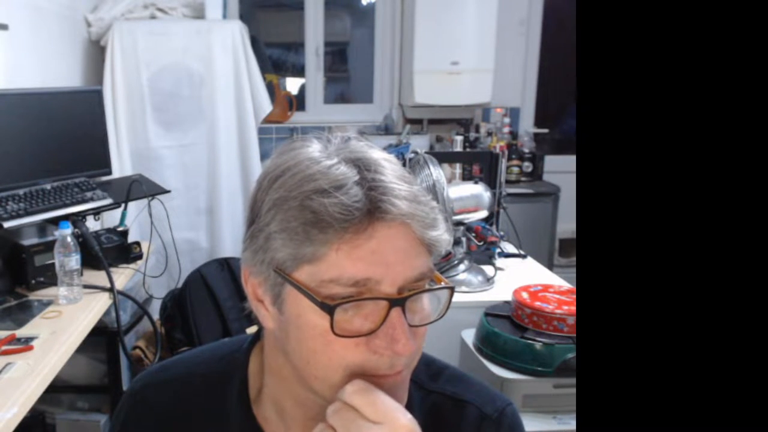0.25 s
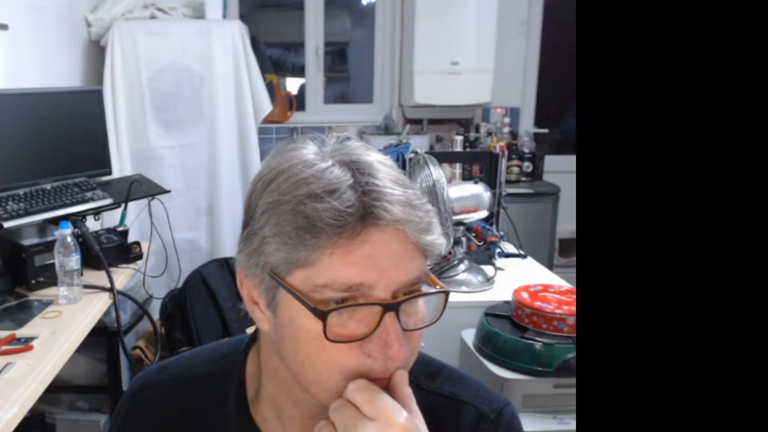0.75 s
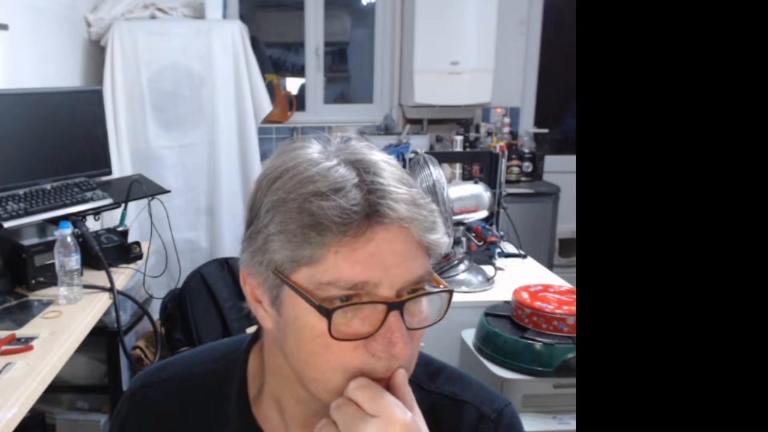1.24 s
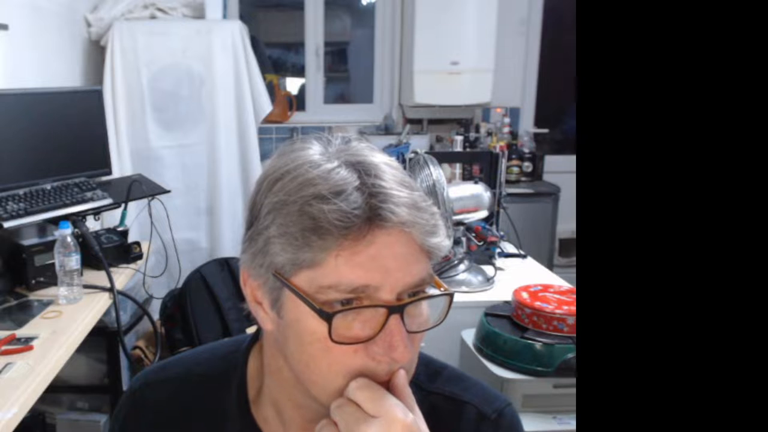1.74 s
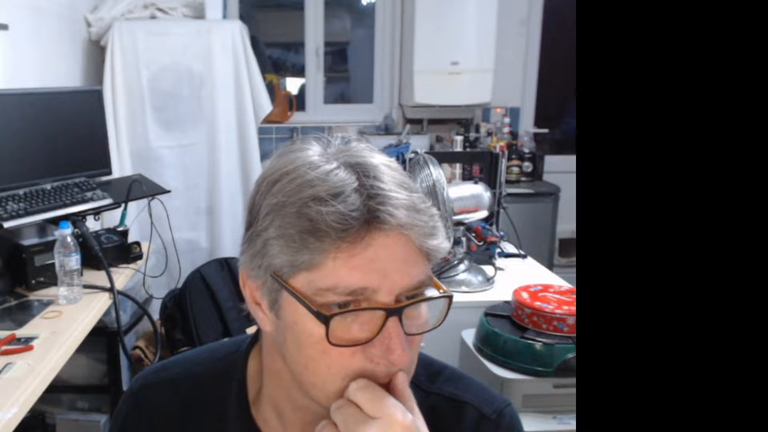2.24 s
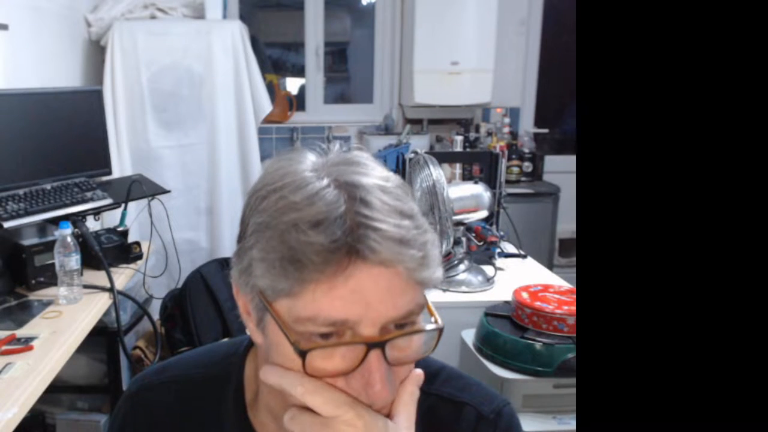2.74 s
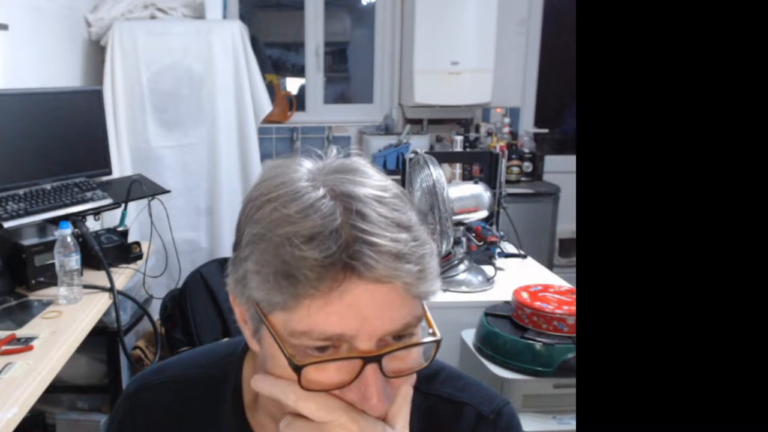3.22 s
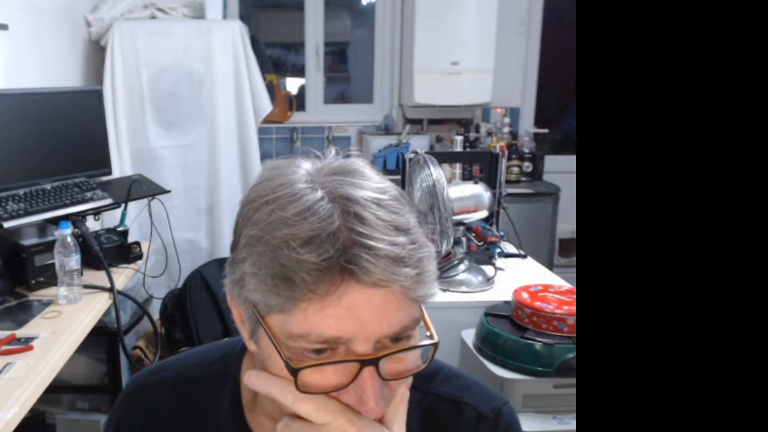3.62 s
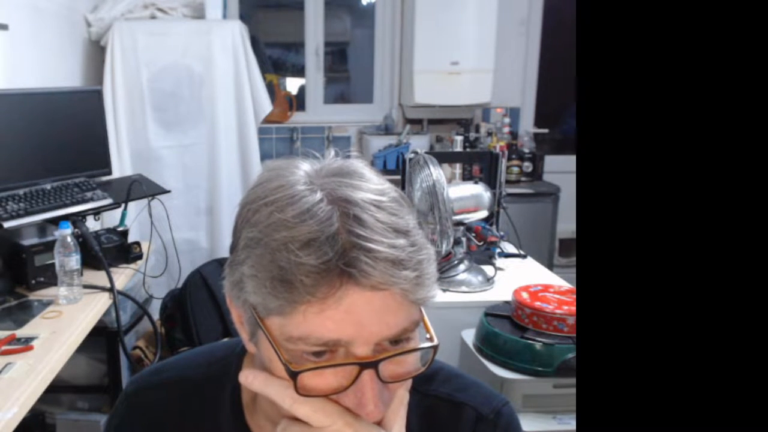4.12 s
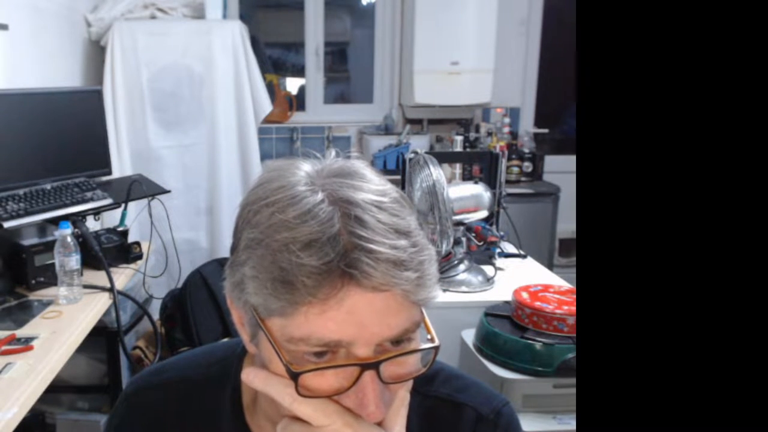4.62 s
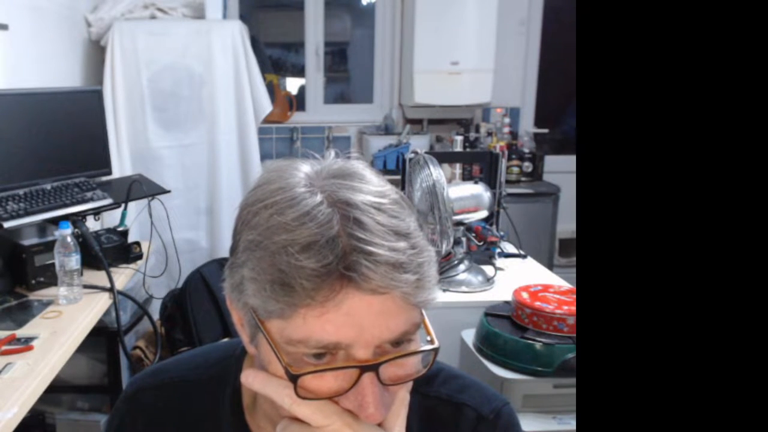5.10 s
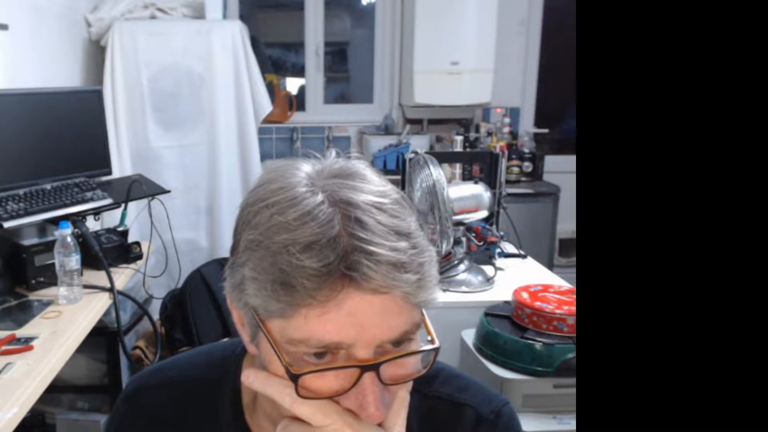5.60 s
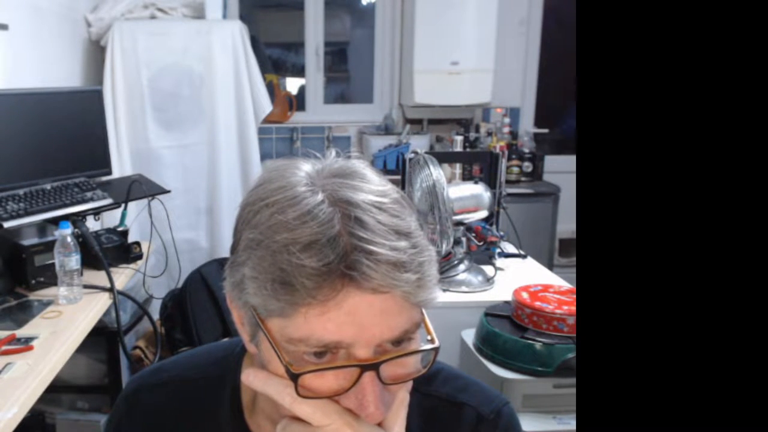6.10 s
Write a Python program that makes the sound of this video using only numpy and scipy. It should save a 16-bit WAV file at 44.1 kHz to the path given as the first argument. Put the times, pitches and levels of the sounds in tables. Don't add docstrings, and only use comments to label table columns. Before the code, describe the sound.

Throughout, two small fans run at nearly equal speeds, making a low, slightly wavering drone whose tones beat together, with motor rumble, mains hum and a steady soft rush of air. At about 0.1 s a hard object clacks sharply onto the desk in a tight chatter, rebounding around 0.15 s with a slightly lower, woody knock; the fan noise dips and creeps back. Near 1.7 and 1.8 s a small switch ticks down and up, bright and quiet. At 2.6 s a soft low thump leads into a loud, cracking knock at 2.75 to 2.8 s, bouncing quickly on the desk, and the background ducks again. Around 3.8 and 3.9 s come fainter, thinner ticks, with a barely audible last one near 4.0 s. Between about 2 and 5 s the fans rise very slightly in pitch and settle, continuing alone until 6.3 s. The room tail is short; treble is muted.

```python
import sys
import numpy as np
from scipy import signal
from scipy.fft import rfft, irfft, next_fast_len
from scipy.io import wavfile
from scipy.ndimage import uniform_filter1d

SR = 44100
rng = np.random.default_rng(int(sys.argv[2]) if len(sys.argv) > 2 else 0)


def volts(x):
    e = np.asarray(x, float) / 20
    return 10 ** e


def to_wav(s):
    ch = np.atleast_2d(s).T
    pcm = np.round(np.clip(ch, -1, 1) * 32767)
    wavfile.write(sys.argv[1], SR, pcm.astype(np.int16))


N = 280035


def wander(rate_hz):
    hold = int(SR / rate_hz)
    steps = np.repeat(rng.standard_normal(N // hold + 1), hold)
    return 1.1 * uniform_filter1d(uniform_filter1d(steps, hold), hold)[:N]


def lag(x, tau_s):
    keep = np.exp(-1 / (tau_s * SR))
    return signal.lfilter([1 - keep], [1, -keep], x)


def fan(rate_hz, multiples):
    turn = 2 * np.pi * np.cumsum(rate_hz) / SR
    tones = np.zeros(N)
    for multiple, level_db in multiples:
        strength = np.sqrt(2) * volts(level_db + 1.2 * wander(4.0))
        tones += strength * np.sin(multiple * turn + 2 * np.pi * rng.random())
    return tones


def two_fans():
    # multiple, level_db [dB rms]
    tones_one = [(1, -71), (2, -77), (3, -60), (4, -60.5), (5, -54.5), (6, -64), (7, -79), (8, -66.5),
                 (9, -85), (10, -64.5), (11, -74.5), (12, -58.5), (16, -70)]
    tones_two = [(1, -67), (2, -77.5), (3, -75), (4, -72.5), (5, -59.5), (6, -71), (7, -69), (8, -76.5),
                 (9, -74.5), (10, -72), (11, -69.5), (16, -69)]
    # time_s, rate_hz
    speed_one = [
        (2.35, 76.2),
        (3.35, 76.82),
        (4.45, 77.06),
        (5.2, 76.54),
        (6.35, 76.38),
    ]
    speed_two = [
        (1.55, 79.27),
        (2.3, 80.07),
        (3.55, 80.21),
        (4.4, 79.4),
        (6.35, 79.0),
    ]
    t = np.arange(N) / SR
    rate_one = np.interp(t, *np.transpose(speed_one))
    rate_two = np.interp(t, *np.transpose(speed_two))
    return fan(rate_one, tones_one) + fan(rate_two, tones_two)


def motors():
    # pitch_hz, level_db [dB rms]
    shaft_tones = [(38.08, -56.0), (40.86, -62.9), (48.74, -77.2), (53.52, -76.2), (97.64, -74.7),
                   (99.91, -68.9), (249.65, -78.2)]
    in_step_s, whine_hz, whine_db = 0.6, 6565, -87
    t = np.arange(N) / SR - in_step_s
    hum = np.zeros(N)
    for pitch_hz, level_db in shaft_tones:
        hum += volts(level_db - 0.5 + 2.0 * wander(1.8)) * np.sin(2 * np.pi * pitch_hz * t)
    whine_turn = 2 * np.pi * np.cumsum(whine_hz + 15 * wander(3.3)) / SR
    return np.sqrt(2) * (hum + volts(whine_db) * np.sin(whine_turn))


def air():
    # frequency_hz, density_db [dB per Hz]
    air_curve = [(22, -104), (40, -87.5), (110, -81), (250, -86.5), (1050, -87), (2000, -83.5), (4400, -99),
                 (8200, -104)]
    # centre_hz, width_hz, lift_db
    housing = [(751, 90, 8), (882, 61, 9), (1195, 67, 3.5), (1360, 350, 1.5), (1630, 220, 2.5),
               (1936, 120, 2.5), (3570, 320, 2), (5070, 430, 2), (5720, 920, -4), (6400, 820, 1.5)]
    size = next_fast_len(N + 1, real=True)
    hz = np.maximum(np.fft.rfftfreq(size, 1 / SR), 1)
    curve_hz, curve_db = np.transpose(air_curve)
    density_db = np.interp(np.log(hz), np.log(curve_hz), curve_db)
    density_db = density_db + sum(lift_db / (1 + (2 * (hz - centre_hz) / width_hz) ** 2)
                                  for centre_hz, width_hz, lift_db in housing)
    spectrum = rfft(rng.standard_normal(size)) * volts(density_db) * np.sqrt(SR / 2)
    band = np.clip(np.round(2 * np.log2(hz)), 10, 26)
    swell_db = 0.5 * wander(1.09)
    rush = np.zeros(N)
    for b in np.unique(band):
        flicker_db = 0.53 * wander(9)
        rush += volts(swell_db + flicker_db) * irfft(spectrum * (band == b), size)[:N]
    return rush


def knock(hits, modes, crack_db=-1.5):
    crack_t60_s, crack_hz = 0.02, 4500
    out = np.zeros(N)
    t = np.arange(SR // 9) / SR
    hz, db, t60_s = np.transpose(modes)[:, :, None, None]
    crowd = 0.037 * np.clip((hz - 900) / 1800, 0.1, 1)
    spread = np.linspace(-1.5, 1.5, 5)[:, None]
    chance = rng.standard_normal((len(hits), 3, len(modes), 5, 1))
    cracks = lag(rng.standard_normal((len(hits), len(t))), 1 / (2 * np.pi * crack_hz))
    cracks = cracks * np.exp(-np.log(1000) / crack_t60_s * t)
    for (start_s, force_db, contact_ms), (spot, detune, late), crack in zip(hits, chance, cracks):
        lead = np.sign(spot[:, :1])
        stir = lead * 0.57 + (0.79 * np.sign(spot) - lead * 0.61) * (crowd > 0.012)
        since = np.maximum(t - 0.00044 * np.abs(late), 0)
        pitch_hz = hz * (1 + crowd * (spread + 0.3 * detune))
        ring = volts(db) * stir * np.sin(2 * np.pi * pitch_hz * since)
        ring = ring * np.exp(-np.log(1000) / t60_s * since)
        ring = ring * np.minimum(since / 0.00037, 1)
        struck = ring.sum((0, 1)) + volts(crack_db) * crack
        push = np.sin(np.pi * np.clip((t[:300] + 0.5 / SR) / (contact_ms / 1000), 0, 1))
        at = int(start_s * SR)
        out[at:at + len(t)] += volts(force_db) * signal.fftconvolve(struck, push / push.sum())[:len(t)]
    return signal.sosfilt(signal.butter(2, 95, "high", fs=SR, output="sos"), out)


def clack_and_rebound():
    # pitch_hz, level_db, t60_s
    clack_modes = [(249, -19, 0.11), (801, -3.5, 0.026), (1015, 1, 0.021), (1460, -4, 0.016),
                   (1750, -4.5, 0.017), (2140, -2, 0.013), (3150, -14.5, 0.029), (3900, -14, 0.024),
                   (4800, -2, 0.011), (5400, -22, 0.01), (6190, -9.5, 0.016), (7300, -6.5, .015)]
    rebound_modes = [(143, -20.5, 0.11), (306, -17.5, 0.094), (736, -0.5, 0.022), (1044, -2, 0.016),
                     (1490, 0.5, 0.016), (1667, -7, .014), (2460, -16, .015), (3280, -14.5, .015),
                     (4240, -11.5, 0.013), (4770, -12, 0.016), (5700, -14, .015), (6430, -10.5, 0.017),
                     (7300, -11, .015)]
    # start_s, force_db, contact_ms
    clack_hits = [
        (.083, -42, 0.56),
        (.094, -45, 0.17),
        (.0992, -24.5, 0.07),
        (.1, -22.5, 0.25),
        (.1035, -26.5, 0.055),
        (.1092, -34.5, 0.31),
        (.1118, -28.5, 0.3),
        (.118, -34.5, 2.5),
    ]
    rebound_hits = [
        (.1436, -18.5, 0.17),
        (.1482, -29.5, 0.097),
        (.159, -21, 1.6),
        (.17, -34, 0.51),
    ]
    return knock(clack_hits, clack_modes, crack_db=1) + knock(rebound_hits, rebound_modes, crack_db=1)


def switch_ticks():
    # pitch_hz, level_db, t60_s
    switch_modes = [(3650, -2, .02), (4660, -21, .012), (5410, 1, 0.013), (6230, -2.5, .025),
                    (7300, 2, 0.025), (8100, 13, .015)]
    # start_s, force_db, contact_ms
    switch_hits = [
        (1.6785, -48, 0.1),
        (1.7995, -49, .05),
        (1.81, -62, 0.087),
    ]
    return knock(switch_hits, switch_modes)


def thump():
    # pitch_hz, level_db, t60_s
    thump_modes = [(144.4, -4.5, 0.17), (274, -2, .07), (420, -9, .05)]
    # start_s, force_db, contact_ms
    thump_hits = [
        (2.621, -46, 1.6),
        (2.629, -46.5, 1.6),
        (2.645, -52, 1.4),
    ]
    return knock(thump_hits, thump_modes)


def desk_bounce():
    # pitch_hz, level_db, t60_s
    desk_modes = [(139, -14, 0.076), (236, -10.5, 0.065), (322, -11, .11), (652, -5, 0.027),
                  (765, -7, 0.03), (1037, -6.5, 0.042), (1260, -3.5, 0.016), (1505, -5.5, 0.033),
                  (2440, -3.5, 0.013), (3110, -6, 0.012), (3980, -8, .015), (4700, -9, 0.015),
                  (6220, -14, 0.02), (7370, -8, 0.019)]
    # start_s, force_db, contact_ms
    desk_hits = [
        (2.748, -40.5, 0.33),
        (2.7616, -26.5, 0.6),
        (2.7652, -21, .09),
        (2.7686, -24, 0.24),
        (2.7732, -30.5, 0.045),
        (2.78, -28.5, 0.93),
        (2.79, -41, 1.5),
        (2.803, -42, 1.5),
    ]
    return knock(desk_hits, desk_modes, crack_db=3.5)


def switch_ticks_again():
    # pitch_hz, level_db, t60_s
    again_modes = [(3300, -5, .015), (4740, 0, .015), (5420, -3, 0.017), (6200, 0, 0.031), (7600, 18, 0.03),
                   (8300, 15.5, .015)]
    # start_s, force_db, contact_ms
    again_hits = [
        (3.7795, -59, 0.051),
        (3.8943, -57, 0.048),
        (3.9, -60, 0.052),
        (3.9766, -62, 0.23),
    ]
    return knock(again_hits, again_modes)


def room(x):
    t60_s, level_db, dull_hz = 0.26, -6, 14000
    thin_hz, thin_share = 2200, 0.49
    t = np.arange(SR // 2) / SR
    tail = rng.standard_normal(len(t)) * 1000 ** (-t / t60_s) * (1 - np.exp(-t / 0.002))
    tail = lag(tail, 1 / (2 * np.pi * dull_hz))
    tail = tail - thin_share * lag(tail, 1 / (2 * np.pi * thin_hz))
    tail = tail / np.sqrt(np.sum(tail ** 2))
    return x + volts(level_db) * signal.fftconvolve(x, tail)[:N]


def scene():
    machines = two_fans() + motors() + air()
    knocks = clack_and_rebound() + thump() + desk_bounce()
    ticks = switch_ticks() + switch_ticks_again()
    return (machines + room(knocks + ticks))[None]


def band_limit(x):
    return signal.sosfilt(signal.butter(12, 8700, fs=SR, output="sos"), x)


def record(dry):
    duck_from_db, duck_share, attack_s, release_s = -38.5, 3.22, 0.028, 0.29
    ceiling = 0.7
    level_db = 10 * np.log10(lag(dry ** 2, 0.017) + 1e-12)
    over_db = np.maximum(level_db - duck_from_db, 0)
    mix = dry * volts(-duck_share * lag(lag(over_db, attack_s), release_s))
    top_cut = signal.butter(12, 6750, fs=SR, output="sos")
    mix = signal.sosfilt(np.tile(top_cut, (2, 1)), mix)
    mix = ceiling * np.tanh(mix / ceiling)
    mix = mix + volts(-99) * rng.standard_normal(dry.shape)
    return band_limit(mix)


dry = scene()
out = record(dry)
to_wav(out)
```